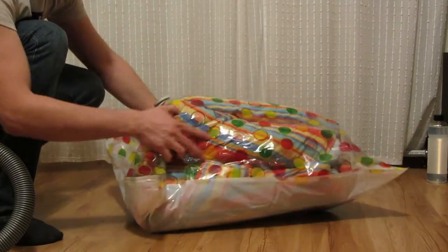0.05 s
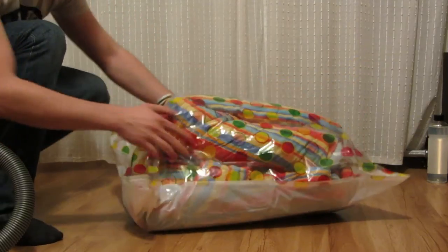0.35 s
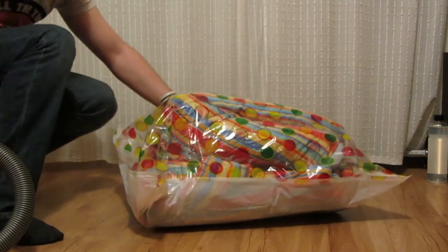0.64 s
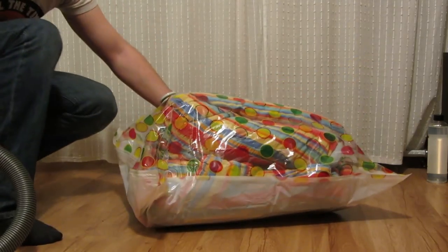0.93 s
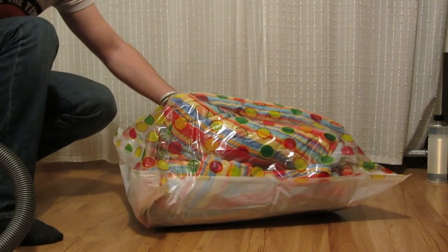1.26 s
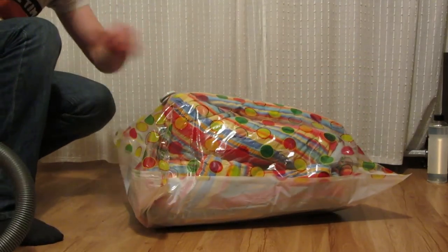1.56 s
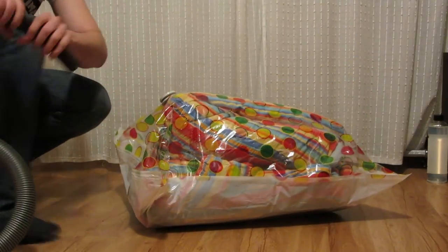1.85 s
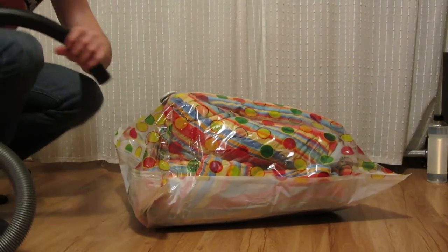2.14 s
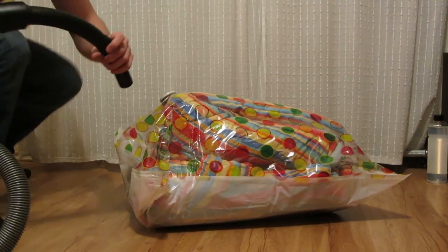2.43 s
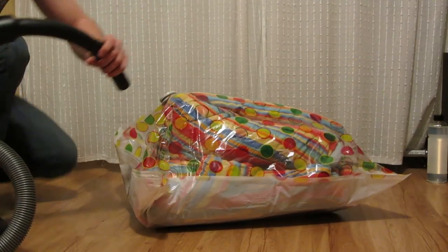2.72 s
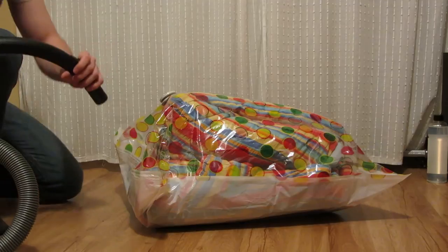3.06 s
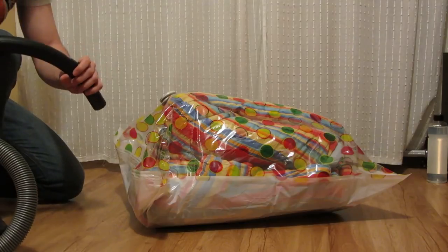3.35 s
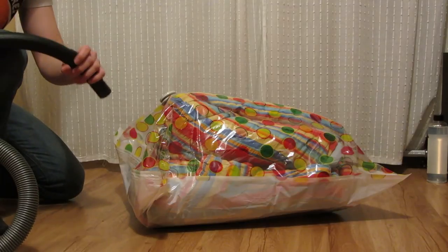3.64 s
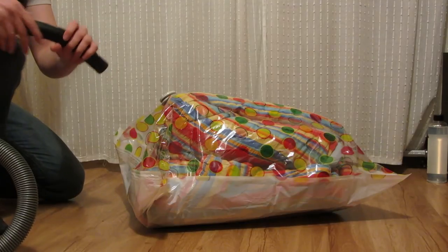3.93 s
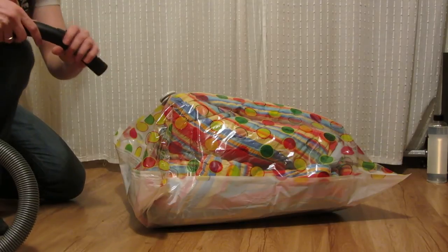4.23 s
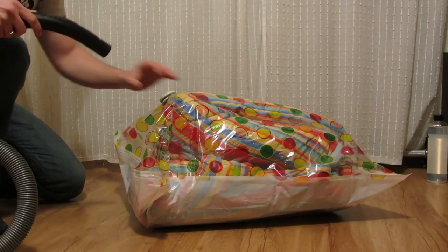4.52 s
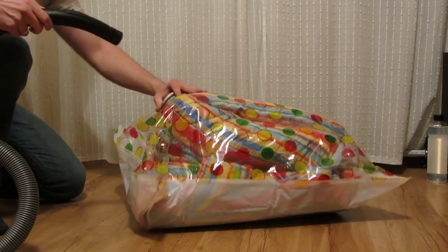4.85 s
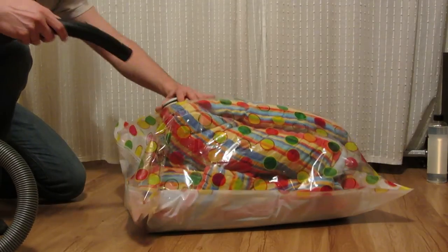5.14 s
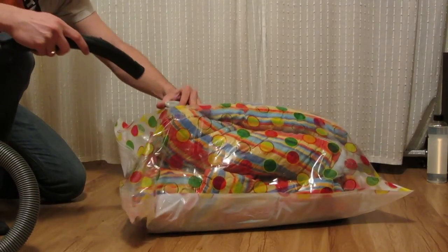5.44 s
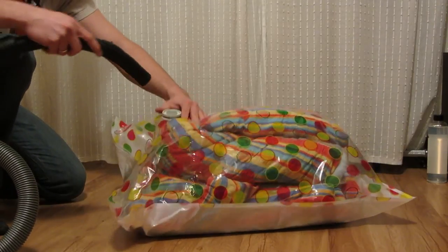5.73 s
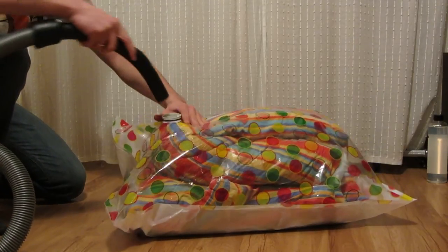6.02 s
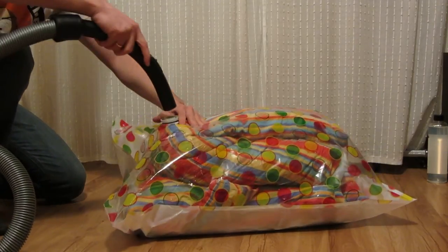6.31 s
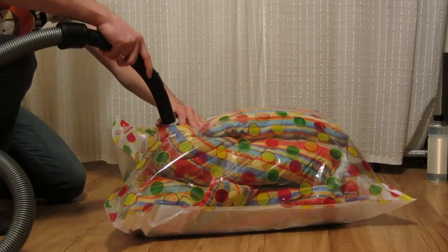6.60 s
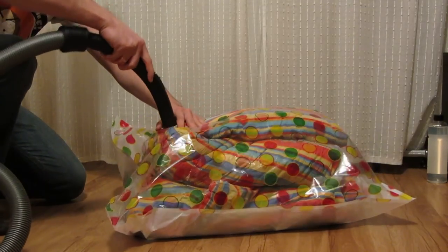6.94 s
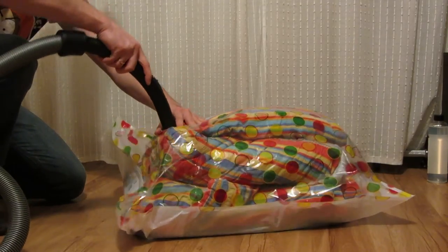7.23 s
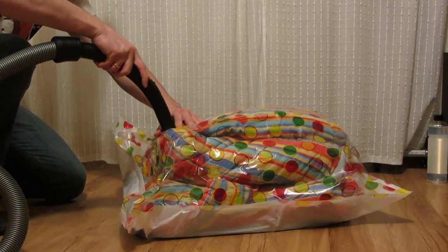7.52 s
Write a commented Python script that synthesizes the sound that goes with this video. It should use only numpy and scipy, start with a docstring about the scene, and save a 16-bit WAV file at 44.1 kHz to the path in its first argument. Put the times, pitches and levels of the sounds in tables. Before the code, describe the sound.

A plastic storage bag crinkles and snaps under a hand, and its valve cap clicks and scrapes. A vacuum hose and tube clatter as they are picked up. A switch clicks, and the vacuum cleaner buzzes, then whines up to speed. The nozzle hisses onto the valve and air roars through it as the motor pitch rises a little. Heard from nearby in a small room with a wooden floor.

```python
"""A vacuum cleaner empties a plastic storage bag on a wooden floor.
First the bag is smoothed by hand; valve cap, hose and wand knock as they are handled.
The cleaner is switched on, buzzes through its soft start and whines up to speed.
Its nozzle hisses as it nears the valve, then seats: air roars through the valve
and the unloaded fan speeds up."""
import sys
import numpy as np
from scipy import signal
from scipy.fft import rfft, irfft, next_fast_len
from scipy.io import wavfile
from scipy.ndimage import uniform_filter1d

SR = 44100
rng = np.random.default_rng(int(sys.argv[2]) if len(sys.argv) > 2 else 0)


def generate_wav(signal):
    """Clip the signal to [-1, 1] and save it as 16-bit WAV at the path in sys.argv[1]."""
    frames = np.transpose(np.atleast_2d(signal))
    scaled = np.clip(frames, -1, 1) * 32767
    pcm = np.round(scaled).astype(np.int16)
    wavfile.write(sys.argv[1], SR, pcm)


N = 333837
TIME = np.arange(N) / SR

SWITCH_S, START_S = 3.52, 3.78   # switch closes, soft start begins
COVER_S, SEAL_S = 6.54, 6.79   # nozzle covers the valve, then seals
FREE_SPEED_HZ = 524.7   # shaft speed, nozzle open
ROOM_T60_S = 0.54


def from_db(db):
    return 10 ** (np.asarray(db) / 20)


def rms_one(x):
    return x / np.sqrt(np.mean(x ** 2) + 1e-20)


def at_hz(points, hz):
    """Interpolate (Hz, value) points on a log-frequency axis."""
    known_hz, values = np.transpose(points)
    return np.interp(np.log(hz + 1), np.log(known_hz), values)


def bins_hz(x):
    return np.fft.rfftfreq(x.shape[-1], 1 / SR)


def drift(rate_hz):
    """Smooth random signal, rms 1."""
    control_hz = 400
    white = rng.standard_normal(int(TIME[-1] * control_hz) + 800)
    pole = np.exp(-2 * np.pi * rate_hz / control_hz)
    slow = signal.lfilter([1], [1, -2 * pole, pole * pole], white)[700:]
    return np.interp(TIME * control_hz, np.arange(len(slow)), rms_one(slow))


def ease(start_s, time_s):
    """Smooth step from 0 to 1."""
    return 1 - np.exp(-(np.maximum(TIME - start_s, 0) / time_s) ** 2)


def stroke(start_s, rise_s, hold_s, db, fade_s):
    """Gain of one gesture: rise, hold, decay."""
    t = TIME - start_s
    attack = np.clip(t / max(rise_s, 0.001), 0, 1)
    return from_db(db) * attack * np.exp(-np.maximum(t - rise_s - hold_s, 0) / fade_s)


def strokes(rows, fade_s):
    """Gestures summed in power."""
    return np.sqrt(sum(stroke(*row, fade_s) ** 2 for row in rows))


def colour(x, spectrum, modes=()):
    """Filter by a spectrum (Hz, dB) and resonances (Hz, width Hz, dB); rms 1."""
    size = next_fast_len(x.shape[-1], True)
    hz = np.fft.rfftfreq(size, 1 / SR)
    peaks = 1 + sum(from_db(db) / (1 + 2j * (hz - centre) / width) for centre, width, db in modes)
    shaped = rfft(x, size) * from_db(at_hz(spectrum, hz)) * peaks
    return rms_one(irfft(shaped, size)[..., :x.shape[-1]])


def swell(hz, modes):
    """Gain of a tone gliding through resonances."""
    return 1 + sum(from_db(db) / (1 + (2 * (hz - centre) / width) ** 2) for centre, width, db in modes)


def diffuse(size=N, side_db=0):
    """Stereo noise, narrowest in the midrange; near sources take a lower side_db."""
    # Each row: frequency in Hz, side over mid in dB.
    width = [(30, 6), (70, 6), (150, -5.5), (1000, -8.5), (2000, -8.5), (4000, -5.5), (8000, -3),
             (14000, 1.5)]
    white = rng.standard_normal((2, next_fast_len(size, True)))
    side = irfft(rfft(white[1]) * from_db(at_hz(width, bins_hz(white)) + side_db), white.shape[-1])
    return (white[0] + side * [[1], [-1]])[:, :size]


def room(x, wet_db):
    """Direct sound plus a dense tail that sets in with the floor reflection."""
    t = TIME[:SR * 3 // 4]
    tail = diffuse(len(t)) * from_db(-60 * t / ROOM_T60_S) * np.clip(t / 0.0052, 0, 1)
    tail /= np.sqrt(np.sum(tail ** 2) / 2)
    return x + from_db(wet_db) * signal.fftconvolve(np.atleast_2d(x), tail, axes=1)[:, :N]


def blow(force, wet_db, spectrum, modes=()):
    """Direct burst and draining room energy, both coloured by the struck object."""
    pole = from_db(-120 / (ROOM_T60_S * SR))
    room_energy = signal.lfilter([1 - pole], [1, -pole], force ** 2 + 1e-18)
    direct = force * diffuse(len(force), side_db=-4.5)
    burst = direct + from_db(wet_db) * np.sqrt(room_energy) * diffuse(len(force))
    return burst.std() * colour(burst, spectrum, modes)


def tone(phase, wet_db):
    """A gliding tone beats against its wall echo and the room; slow rms held at 1."""
    echo_s, echo_db = 0.0286, -6
    echo = from_db(echo_db) * np.sin(np.interp(TIME - echo_s, TIME, phase))
    heard = room(np.sin(phase) + echo, wet_db)
    return heard / np.sqrt(uniform_filter1d(np.mean(heard ** 2, axis=0), size=SR // 6) + 1e-9)


def crackle(per_s, spread_db):
    """Tiny creases give way at random, a few much louder than the rest."""
    sizes = from_db(spread_db * np.minimum(rng.exponential(1, N), 4)) * rng.choice([-1, 1], N)
    return rms_one(sizes * (rng.random(N) < per_s / SR))


def bag():
    """Film rustles and crackles in clumps under the hand; sleeves slide over it."""
    # Each row: start, rise and hold in seconds, rustle and fine crackle in dB.
    pushes = [(0.0, 0.0017, 0.017, -22, -26), (0.11, .03, 0.17, -33.5, -35.5),
              (0.326, 0.037, 0.12, -34, -41), (0.52, .04, 0.043, -41.5, -62), (5.047, 0.018, .01, -36, -30),
              (5.468, 0.023, 0.014, -23.5, -21)]
    # Each row: start, rise and hold in seconds, level in dB.
    slides = [(0.6, .06, 0.24, -39), (0.98, 0.13, 0.25, -45), (1.3, 0.022, .11, -41),
              (1.79, .02, 0.49, -48), (2.33, 0.084, 0.22, -46.5), (2.88, .13, 0.095, -47),
              (3.27, 0.037, 0.045, -46)]
    # Spectra. Each row: frequency in Hz, gain in dB.
    slide_colour = [(25, -32), (60, -12), (150, -6.5), (340, 0.5), (600, -1.5), (1450, 3.5), (2200, -1),
                    (4000, -3.5), (7000, -9), (11000, -21.5), (16000, -43)]
    rustle_colour = [(50, -40), (170, -3.5), (300, -0.5), (600, -3), (1300, 3.5), (2000, 1.5),
                     (4500, -2.5), (7000, -5.5), (16000, -37)]
    fizz_colour = [(1000, -30), (4000, -2), (6500, -2), (10000, -1), (16000, -17)]
    rustle = strokes([(*timing, db) for *timing, db, _ in pushes], fade_s=0.11)
    fizz = strokes([(*timing, db - 6.5) for *timing, _, db in pushes], fade_s=0.11)
    grains = crackle(per_s=4000, spread_db=3.5)
    film = rustle * colour(room(grains, wet_db=3), rustle_colour)
    fine_grains = crackle(per_s=1200, spread_db=4.5) + 1.4 * crackle(per_s=80, spread_db=3)
    film += fizz * colour(room(fine_grains, wet_db=-1), fizz_colour)
    sleeves = strokes(slides, fade_s=0.15) * colour(diffuse(), slide_colour)
    clumps = from_db(1.8 * drift(50))
    film_limit = 0.2
    return film_limit * np.tanh(clumps * film / film_limit) + sleeves


def snaps():
    """A crease flips: one sharp pressure pulse and a short, pitched shiver of the film."""
    # Each row: start in seconds, level in dB, ring in Hz.
    creases = [(0.0074, -14.5, 1490), (0.045, -25, 7000), (0.0729, -15.5, 3450), (0.161, -19, 8200),
               (0.2146, -19.5, 7000), (0.3452, -20.5, 8000), (0.4063, -16.5, 3500), (0.481, -25, 7000),
               (0.5744, -36, 6800), (0.697, -26, 3000), (1.7995, -32, 2700), (2.4088, -32.5, 7000),
               (3.345, -38, 6500)]
    film_colour = [(300, -6), (1300, 3.5), (3700, 0.5), (7000, -5.5), (11000, -5.5), (16000, -22)]
    shivers, pulses, t = np.zeros((2, N)), np.zeros(N), TIME[:SR // 2]
    for start_s, db, ring_hz in creases:
        onset = int(start_s * SR)
        force = from_db(db) * (np.exp(-t / 0.00058) + 0.11 * np.exp(-t / 0.0025))
        ring = (ring_hz, 0.56 * ring_hz, 7)
        shivers[:, onset:onset + len(t)] += blow(force, wet_db=2.5, spectrum=film_colour, modes=[ring])
        pulses[onset] += from_db(db + 7)
    ticks = signal.sosfilt(signal.butter(1, [2500, 9000], "band", fs=SR, output="sos"), pulses + 1e-18)
    return room(ticks, wet_db=0) + shivers


def knocks():
    """Hollow plastic parts crack and clatter: heavy contacts thump, hard ones are bright."""
    # Each row: start in seconds, clatter, crack and thump in dB, brightness in dB per octave,
    # ring in Hz, ring gain in dB.
    contacts = [(0.694, -26, -46, -10, 1.5, 756, 7), (0.752, -14.5, -13, 1.5, 0.1, 151, 0),
                (0.773, -18, -23, -33, -2, 1100, -23), (1.029, -30.5, -36, 12, 2.5, 765, 20),
                (1.447, -30.5, -44, -11, 5, 1600, -8), (1.9147, -18.5, -14, 8, 1.5, 1250, 5),
                (1.946, -22.5, -39, -2, 1, 1280, 12), (2.1102, -30, -27, 15, 2.5, 1500, 6),
                (2.335, -39, -42, 1, -2, 759, -4), (2.576, -19, -36, -20, -3.5, 810, 7),
                (2.61, -11, -19, -12.5, -1, 3730, 8.5), (2.634, -15.5, -28.5, -30, -3.5, 10800, 5),
                (2.674, -25, -29.5, -1, -4, 1180, -5), (3.498, -23, -44, -3.5, -2.5, 955, 12),
                (3.524, -12, -22, -18.5, -3.5, 603, 4)]
    # Each row: frequency in Hz, gain in dB.
    knock_colour = [(35, -40), (100, -25), (150, -5.5), (220, -1), (600, -0.5), (1270, 2), (3000, -3),
                    (8700, -14.5), (11000, -24), (16000, -37)]
    # Wand and casing. Each row: centre and width in Hz, gain in dB.
    plastic_modes = [(186, 34, 1.5), (355, 49, 0), (680, 74, -15), (1110, 180, -12), (4170, 600, -25),
                     (10900, 1100, -16)]
    thump_below_hz, bright_above_hz, clatter_s, crack_s = 416, 490, 0.0059, 0.00053
    out, t = np.zeros((2, N)), TIME[:SR * 3 // 4]
    hz = np.geomspace(35, 16000, num=30)
    bass = 1 / (1 + (hz / thump_below_hz) ** 4)
    octaves = np.maximum(np.log2(hz / bright_above_hz), 0)
    for start_s, clatter_db, crack_db, thump_db, db_per_octave, ring_hz, ring_db in contacts:
        gain_db = at_hz(knock_colour, hz) + thump_db * bass + db_per_octave * octaves
        clatter = from_db(clatter_db) * np.exp(-t / clatter_s)
        crack = from_db(crack_db) * np.exp(-t / crack_s)
        force = (clatter + crack) * (1 - np.exp(-t / 0.001))
        modes = plastic_modes + [(ring_hz, 0.11 * ring_hz, ring_db)]
        knock = blow(force, wet_db=4.5, spectrum=np.transpose([hz, gain_db]), modes=modes)
        out[:, int((start_s + 0.001) * SR):][:, :len(t)] += knock
    return out


def cap():
    """The valve cap turns in uneven slips."""
    # Each row: start, rise and hold in seconds, level in dB.
    turns = [(0.695, 0.0034, 0.04, -35), (1.028, .006, 0.017, -37), (1.095, 0.018, 0.05, -39.5)]
    # Each row: frequency in Hz, gain in dB.
    cap_colour = [(200, -20), (480, -15), (620, -5), (850, -5), (1100, -10), (1500, -23), (4000, -21),
                  (12000, -50)]
    return strokes(turns, fade_s=0.066) * from_db(1.6 * drift(50)) * colour(diffuse(), cap_colour)


def wand():
    """The tube rings in short modes as it is picked up."""
    # Each row: start in seconds, relative level in dB.
    hits = [(1.916, -14.5), (1.946, -23), (2.113, -38)]
    # Each row: frequency in Hz, gain in dB, T60 in seconds.
    tube_modes = [(526, -6.5, 0.062), (1146, -4, 0.14), (1150, -8, 0.18), (1243, -8.5, 0.18),
                  (1425, -9.5, 0.16), (2740, -2, 0.04)]
    out, t = np.zeros(N), TIME[:SR // 5]
    for start_s, hit_db in hits:
        for hz, mode_db, t60_s in tube_modes:
            ring = from_db(hit_db + mode_db - 60 * t / t60_s) * np.sin(2 * np.pi * hz * t)
            out[int(start_s * SR):][:len(t)] += ring * rng.choice([-1, 1])
    return from_db(-5) * room(out, wet_db=1.5)


def hose():
    """The ribbed hose scrapes along the floor and swishes over cloth."""
    # Each row: start, rise and hold in seconds, level in dB.
    scrapes = [(1.97, 0.11, .09, -46.5), (2.55, 0.016, 0.28, -40), (2.92, 0.071, 0.018, -47)]
    # Spectra. Each row: frequency in Hz, gain in dB.
    scrape_colour = [(400, -20), (1000, -16), (1350, -3), (1700, 1), (2100, -6), (3000, -11), (8000, -48)]
    swish_colour = [(1000, -30), (2600, -8), (3900, 1.5), (5500, -4), (8000, -9), (12000, -18),
                    (16000, -32)]
    swish_gain = stroke(2.41, rise_s=0.077, hold_s=0.14, db=-38.5, fade_s=0.045)
    swish = swish_gain * colour(diffuse(), swish_colour)
    scrape_gain = strokes(scrapes, fade_s=0.093) * from_db(1.5 * drift(25))
    return swish + scrape_gain * colour(diffuse(), scrape_colour)


def knee():
    """A knee lands: a dull thud through the floorboards."""
    # Each row: frequency in Hz, gain in dB.
    thud_colour = [(25, -13), (45, -12), (75, -1), (115, 2), (200, -8), (300, -11), (600, -42), (2000, -70)]
    gain = stroke(3.068, rise_s=0.01, hold_s=0.03, db=-42, fade_s=0.1)
    return gain * colour(diffuse(side_db=-2), thud_colour)


def grip():
    """The hand squeaks on the grip."""
    # Each row: frequency in Hz, gain in dB.
    squeak_colour = [(4000, -37), (6200, -7), (6650, 6), (7100, -25), (10000, -16), (16000, -30)]
    gain = stroke(3.342, rise_s=0.0066, hold_s=0.044, db=-48, fade_s=0.04)
    return gain * colour(diffuse(), squeak_colour)


def buzz():
    """A hum follows the switch; chopped mains current buzzes the windings, most in the soft start."""
    # Each row: frequency in Hz, relative level in dB.
    partials = [(100.4, -57), (200.8, -53), (301.3, -52), (402.5, -48), (503, -51.5), (704, -46.5),
                (904, -42), (1005, -50.5), (1105, -54), (1707, -59)]
    windings = sum(from_db(db + 3.4 * drift(35)) * np.sin(2 * np.pi * (hz * TIME + rng.random()))
                   for hz, db in partials)
    chopping = ease(START_S, 0.079) * from_db(-1 + 4.2 * ease(4.18, 0.42) - 9.5 * ease(4.8, 0.17))
    hum_gain = stroke(SWITCH_S, rise_s=0.1, hold_s=0.33, db=-59.5, fade_s=0.15)
    return np.sqrt(2) * (chopping * windings + hum_gain * np.sin(2 * np.pi * 123.8 * TIME))


def choked():
    """Rises to 1 while the nozzle covers the still closed valve."""
    return ease(COVER_S, 0.017) * (1 - ease(SEAL_S, 0.052))


def exhaust(speed_hz):
    """Turbulence in the casing grows with speed and drops once the nozzle is covered."""
    # Spectra. Each row: frequency in Hz, gain in dB.
    rush_colour = [(30, -46), (90, -28), (200, -11.5), (350, -8), (450, -7.5), (800, 2.5), (1100, 4.5),
                   (1400, 0.5), (2700, -2), (3500, -10), (5000, -15.5), (9000, -19), (16000, -66)]
    hiss_colour = [(1000, -24), (3000, 2.5), (5000, 0), (6800, 1.5), (9000, -6.5), (12000, -12),
                   (16000, -22)]
    # Each row: centre and width in Hz, gain in dB.
    casing_modes = [(382, 17, -21), (619, 5.4, 7.5), (1089, 13, 4.5), (1490, 4, -38), (1686, 11, 8.5),
                    (2300, 14, -15), (2620, 110, -29)]
    pace, covered = np.minimum(speed_hz / FREE_SPEED_HZ, 1), ease(COVER_S, 0.026)
    rush = from_db(-21.5 - 3.5 * covered) * pace ** 0.98 * colour(diffuse(), rush_colour, casing_modes)
    hiss = from_db(-25 - 2 * covered) * pace ** 2.46 * colour(diffuse(), hiss_colour)
    return (rush + hiss) * from_db(0.42 * drift(20) - 3.3 * choked())


def fan(speed_hz, shaft_rad):
    """Blade tone and overtones; unsteady flow makes the whine rough and patchy during run-up."""
    # Each row: centre and width in Hz, gain in dB.
    duct_modes = [(2760, 270, -0.5), (6420, 800, 14.5)]
    # High overtones let out by the casing. Each row: frequency in Hz, level in dB.
    outlet = [(2500, -60), (4500, -19), (6800, -28), (8500, -50), (10000, -51), (11000, -46), (12300, -37),
              (13500, -53), (14700, -51)]
    blades, bite_s, settle_s, lock_s = 7, 4.16, 5.08, 5.5
    blade_hz, covered = blades * speed_hz, ease(COVER_S, 0.074)
    unsteady = np.interp(TIME, [4.5, 5.0, 5.6], [1, 0.4, 0.06])
    jitter_hz = 5.5 * unsteady * drift(80)
    blade_rad = blades * (shaft_rad + 2 * np.pi * np.cumsum(jitter_hz) / SR)
    blade_db = -31.5 + 5.5 * ease(lock_s, 0.082) - 13 * covered
    blade_gain = from_db(blade_db) * (speed_hz / FREE_SPEED_HZ) ** 1.27 * swell(blade_hz, duct_modes)
    octave_db = -37.5 - 9 * ease(settle_s, 0.15)
    octave_gain = from_db(octave_db) * ease(bite_s, 0.12) * swell(2 * blade_hz, duct_modes)
    whine = blade_gain * tone(blade_rad, wet_db=-4.5) + octave_gain * tone(2 * blade_rad, wet_db=-0.5)
    for order in (3, 4):
        gain = from_db(at_hz(outlet, order * blade_hz) - 10 * covered) * ease(4.3, 0.23)
        whine += gain * tone(order * blade_rad, wet_db=1)
    patches = from_db((1 + 2 * unsteady) * drift(15))
    return patches * whine


def brushes(speed_hz):
    """Carbon brushes spark while the motor pulls up to speed."""
    # Each row: frequency in Hz, gain in dB.
    spark_colour = [(1000, -20), (1800, 14), (3600, -2), (5000, 14), (7500, -1), (10000, -26), (16000, -44)]
    load = np.sqrt(np.maximum(1 - speed_hz / FREE_SPEED_HZ, 0))
    return from_db(-39.5) * ease(3.907, 0.2) * load * colour(diffuse(), spark_colour)


def rotor(speed_hz, shaft_rad):
    """Unbalance sounds once a turn, with overtones, and swells through a casing mode."""
    radiates_above_hz, mode_hz, width_hz, mode_db = 250, 508, 15.3, 1
    radiated = 1 - np.exp(-(speed_hz / radiates_above_hz) ** 5)
    gain = from_db(-23 - choked()) * radiated * swell(speed_hz, [(mode_hz, width_hz, mode_db)])
    fundamental = tone(shaft_rad, wet_db=-1.5)
    overtones = tone(2 * shaft_rad, wet_db=8) + tone(3 * shaft_rad, wet_db=-22)
    return gain * (fundamental + from_db(-16.5) * overtones)


def gap_jet():
    """Air jets through the gap as the nozzle lands and is shifted."""
    # Each row: start, rise and hold in seconds, level in dB.
    jets = [(6.516, .025, 0.13, -16), (6.76, 0.014, 0.024, -21.5)]
    # Each row: frequency in Hz, gain in dB.
    jet_colour = [(300, -33), (1200, -6.5), (2300, -5), (3700, -2.5), (4600, -3), (6500, -0.5),
                  (9000, -5.5), (12000, -10.5), (16000, -20)]
    gain = strokes(jets, fade_s=0.13) * from_db(0.56 * drift(40))
    return gain * colour(diffuse(side_db=-6), jet_colour)


def valve():
    """Under the sealed nozzle the valve roars and flutters, easing as the bag empties."""
    # Each row: frequency in Hz, gain in dB.
    roar_colour = [(30, -60), (110, -22.5), (350, -28), (600, -11), (850, -2.5), (1150, -1.5), (1450, -10),
                   (2000, -14.5), (2700, -10.5), (3600, -21), (5900, -15.5), (7200, -24), (12000, -29),
                   (16000, -34)]
    # Each row: centre and width in Hz, gain in dB.
    valve_modes = [(700, 15, 0), (814, 12, 3), (896, 17, 1.5), (1072, 12, 8), (1164, 36, -2.5),
                   (2233, 33, 7.5), (2547, 9.3, 8.5), (2755, 21, 6), (5670, 200, 3), (6000, 160, 6.5),
                   (6550, 21, 15)]
    sag_db_per_s = 3
    roar_db = -16.5 - sag_db_per_s * np.maximum(TIME - SEAL_S, 0) + 0.98 * drift(21)
    return from_db(roar_db) * ease(SEAL_S, 0.059) * colour(diffuse(side_db=-5), roar_colour, valve_modes)


def scene():
    """Handling noises, then the cleaner, over quiet room noise."""
    # Each row: frequency in Hz, gain in dB.
    room_colour = [(25, -12), (60, -11), (150, -1), (380, 2), (1200, -4), (4000, -8), (16000, -21)]
    handling = bag() + snaps() + cap() + hose() + grip() + knocks() + wand() + knee()
    spin_up_s, relief_s, relief_hz = 0.78, 0.45, 52   # relief: the covered fan gains speed
    speed_hz = FREE_SPEED_HZ * ease(START_S, spin_up_s) + relief_hz * ease(COVER_S, relief_s)
    shaft_rad = 2 * np.pi * np.cumsum(speed_hz * (1 + 0.0003 * drift(12))) / SR
    motor = rotor(speed_hz, shaft_rad) + fan(speed_hz, shaft_rad) + brushes(speed_hz) + buzz()
    air = exhaust(speed_hz) + gap_jet() + valve()
    return handling + motor + air + from_db(-55.5) * colour(diffuse(), room_colour)


def record(dry):
    """The bass leans right and the high treble left; the top is cut."""
    # Each row: frequency in Hz, left over right in dB.
    balance = [(60, -3), (130, -3.5), (500, -3.5), (1000, -1.2), (4000, -0.8), (8000, 0.3), (13000, 2.5)]
    cutoff_hz = 16000
    padded = np.pad(dry, ((0, 0), (0, next_fast_len(N + SR // 10, True) - N)))
    hz = bins_hz(padded)
    lean = from_db(at_hz(balance, hz) * [[0.5], [-0.5]])
    lowpass = np.clip((cutoff_hz - hz) / 150 + 0.5, 0, 1)
    return irfft(rfft(padded) * lean * lowpass, padded.shape[-1])[:, :N]


dry = scene()
out = record(dry)
generate_wav(out)
```